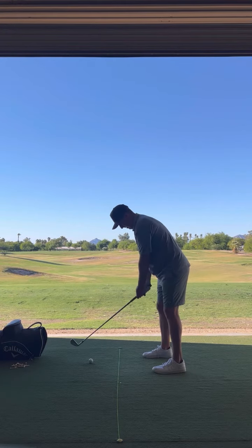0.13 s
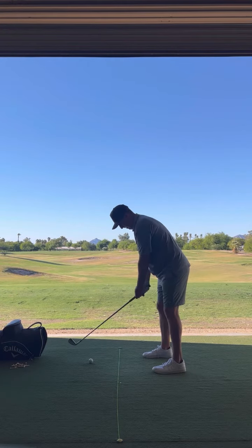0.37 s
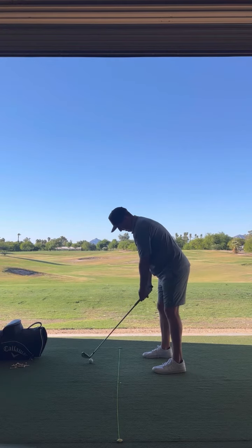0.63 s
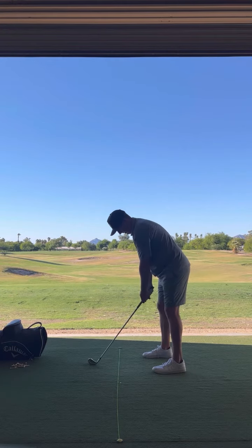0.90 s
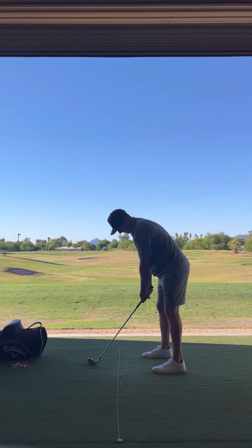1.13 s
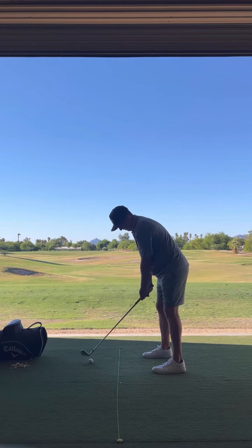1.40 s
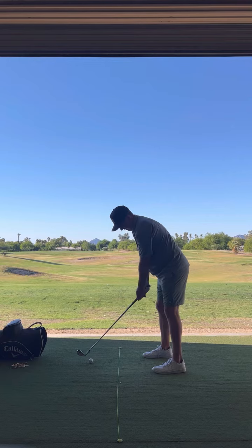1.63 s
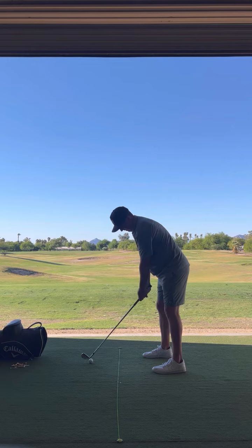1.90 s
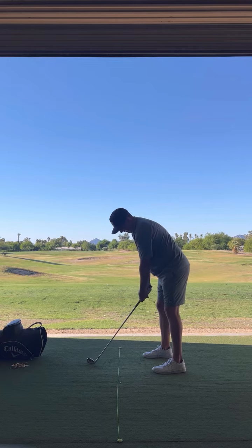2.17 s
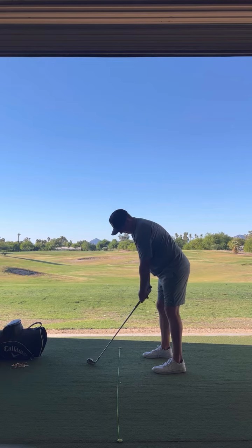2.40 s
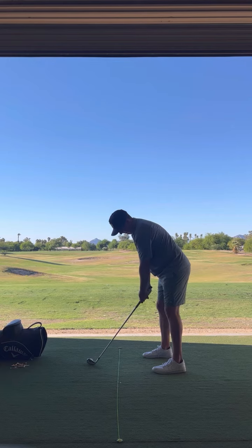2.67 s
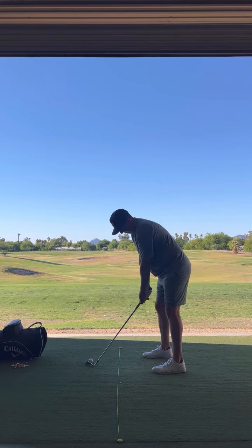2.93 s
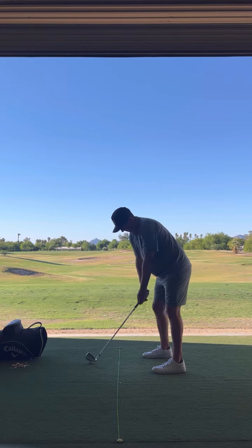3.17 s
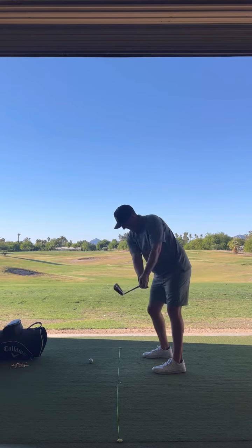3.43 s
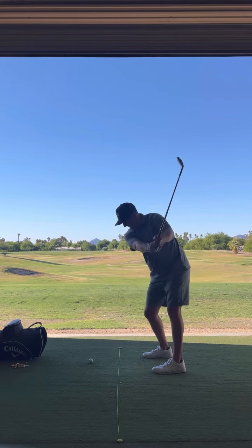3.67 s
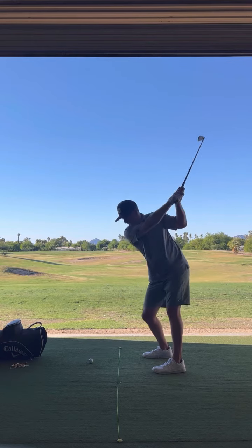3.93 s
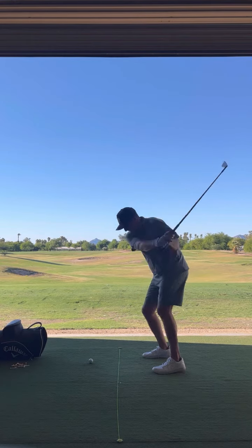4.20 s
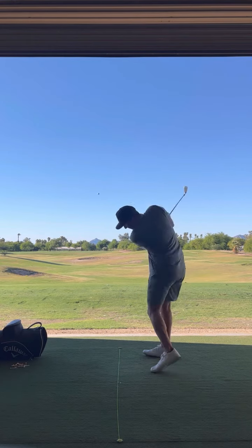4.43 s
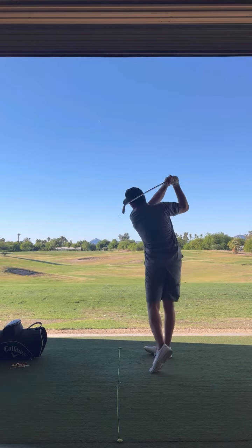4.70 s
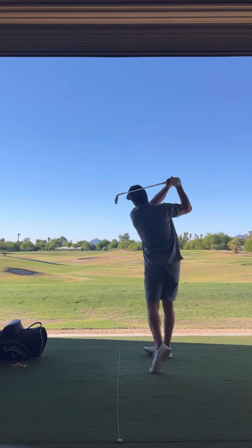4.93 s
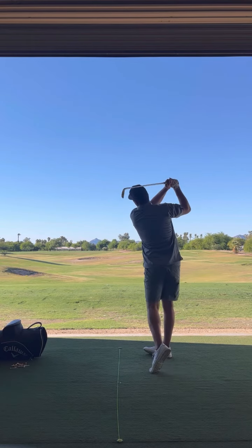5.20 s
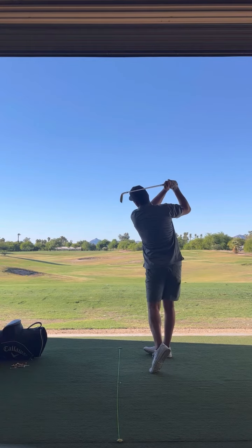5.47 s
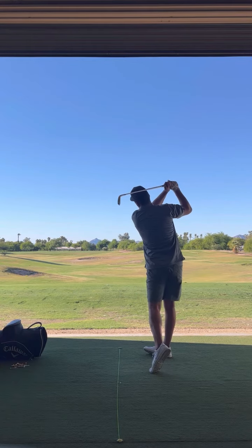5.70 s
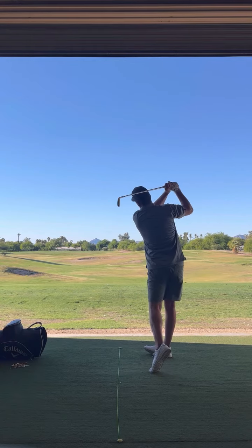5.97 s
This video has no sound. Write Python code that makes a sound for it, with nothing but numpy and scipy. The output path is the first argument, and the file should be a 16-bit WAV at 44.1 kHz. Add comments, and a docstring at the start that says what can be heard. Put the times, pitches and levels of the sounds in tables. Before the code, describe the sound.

A quiet stereo phone pickup under the roof of an open range bay. Throughout, a deep, slightly pulsing machinery and traffic rumble, with a barely audible hum. A faint cloth rustle opens it. From 0.2 to 3.3 s, distant birds give brief calls around 2.3 kHz, some hoarse and falling, some clear and peaked, with soft outdoor echoes. Around 3.7 and 3.9 s a second bird warbles; clothes rustle with the backswing and a tiny high tick sounds at 3.95. At 4.3 s a short swish with a low whistle rises and is cut at 4.32 by one explosive, bright crack of iron on ball, with a mat thud, rapid roof and wall slaps, a thin ringing shaft and a noisy wash fading within a second. Very faint warbles come at 4.8 and 5.1, small ticks at 5.6, 5.86 and 5.94, then rustle as the rumble swells at 6 s.

```python
"""Under the roof of a range bay, machinery and traffic rumble on with two beating low tones and a faint hum.
Clothes rustle from the start and through the swing, while far birds call with gliding tones and echoes.
A second bird warbles and small ticks sound; then an iron swishes down, as rushing noise and a whistle.
It strikes a golf ball off a mat: one crack made of resonances, slaps from roof and walls, a thud,
a ringing shaft and a wash of dying noise. Ticks and rustle follow, and the rumble grows at the end."""
import sys
import numpy as np
from scipy import signal
from scipy.fft import rfft, irfft, next_fast_len
from scipy.io import wavfile
from scipy.ndimage import uniform_filter1d, map_coordinates

SR = 44100
rng = np.random.default_rng(int(sys.argv[2]) if len(sys.argv) > 2 else 0)


def makeup_ratio(level_db):
    """Linear amplitude ratio for a level in decibels (20 dB per factor of ten)."""
    decades = np.asarray(level_db, float) / 20
    return 10 ** decades


def bounce(signal):
    """Save signal as a 16-bit WAV file at the path given by the first command-line argument."""
    frames = np.transpose(np.atleast_2d(signal))
    limited = np.clip(frames, -1, 1)
    pcm = np.round(limited * 32767).astype(np.int16)
    wavfile.write(sys.argv[1], SR, pcm)


N = 268569  # length in samples
T = np.arange(N) / SR
LEFT_RIGHT = np.array([[.5], [-.5]])  # shares a left-minus-right difference between the two sides


def unit(x):
    """Scaled to rms 1."""
    return x / np.sqrt(np.mean(x ** 2) + 1e-20)


def along(points, hz):
    """Reads a curve of (Hz, value) points, straight between them on a log axis."""
    f, v = np.transpose(points)
    return np.interp(np.log(hz + 1), np.log(f + 1), v)


def wobble(rate):
    """A smooth random curve with rate knots a second, 40 at most."""
    knots = rng.standard_normal(int(N * 40 / SR) + 4)
    return map_coordinates(knots, [T * min(rate, 40)])


def filtered(x, response):
    """Passes x through a filter given as a complex response over frequency."""
    m = next_fast_len(x.shape[-1] + 8192)
    return irfft(rfft(x, m) * response(np.fft.rfftfreq(m, 1 / SR)), m)[..., :x.shape[-1]]


def resonance(hz, centre_hz, width_hz):
    """One causal resonance, gain 1 at its centre."""
    return 1j * hz * width_hz / (centre_hz ** 2 - hz ** 2 + 1j * hz * width_hz)


def breathy(count, width_hz):
    """Noise of rms 1, mostly below width_hz: multiplied on a tone it widens the line."""
    return unit(filtered(rng.standard_normal(count), lambda hz: np.exp(-(hz / width_hz) ** 2)))


def swell(peak_s, rise_s, fall_s):
    """A bell-shaped gain with its own width on each side of the peak."""
    return np.exp(-((T - peak_s) / np.where(T < peak_s, rise_s, fall_s)) ** 2)


def tone(hz, db):
    """A sine of given pitch and rms level."""
    return np.sqrt(2) * makeup_ratio(db) * np.sin(2 * np.pi * np.cumsum(hz) / SR)


def add(track, s, sound):
    """Mixes a short sound into the track at s seconds."""
    part = track[..., round(s * SR):][..., :sound.shape[-1]]
    part += sound[..., :part.shape[-1]]


# How alike left and right are in broad noise.
# Each row: pitch in Hz, likeness (1 is the same, 0 unrelated, below 0 opposed; more than 1 counts as 1).
LIKENESS = [(60, 0.95), (150, 1.05), (380, 0.66), (950, 0.41), (2380, 0.32), (5980, -0.17), (15000, 0.25)]


def rush(spectrum, patchy_db):
    """Stereo noise shaped by a spectrum, with patches of random gain; its middle has rms 1."""
    z = signal.stft(rng.standard_normal((2, N)), nperseg=512)[2]
    field = uniform_filter1d(rng.standard_normal(z.shape[1:]), 6, 0)  # smooth over pitch
    field = uniform_filter1d(field, 12, 1)  # smooth over time
    pair = signal.istft(z * makeup_ratio(patchy_db * unit(field)), nperseg=512)[1][:, :N]

    def mid_and_side(hz):
        angle = np.arccos(np.clip(along(LIKENESS, hz), -1, 1)) / 2
        return makeup_ratio(along(spectrum, hz)) * np.array([np.cos(angle), np.sin(angle)])

    mid, side = filtered(pair, mid_and_side)
    return np.array([mid + side, mid - side]) / np.std(mid)


# Unsteady machine tones.
# Each row: pitch in Hz, level in dB before the flutter, pitch wander in Hz, level wander in dB.
MACHINE = [(57.2, -53.5, 2, 0.6), (72.4, -51, .7, 1.2)]


def machine_tones():
    """Two low tones beat together; each wanders and flutters."""
    tones = 0
    for hz, db, wander_hz, wander_db in MACHINE:
        steady = tone(hz + wander_hz * wobble(4.5), db + wander_db * wobble(3.8))
        tones = tones + steady * (1 + .7 * breathy(N, 5.1))
    return tones


def hum():
    """A faint single tone, its pitch and strength unsteady."""
    return tone(362.4 + 1.5 * wobble(8), -65.5) * (.7 + .55 * breathy(N, 12))


# The background grows towards the end.
# One row: loudest at in seconds, swell in seconds, rumble growth in dB, traffic growth in dB.
GROWTH = (6, .5, 2.5, 1.5)
# Spectrum of the rumble. Each row: pitch in Hz, relative level in dB per Hz.
RUMBLE = [(18, -46.5), (30, -17), (44, -3.5), (65, -12), (83, -3.5), (97, -7.5), (119, -9), (146, -10.5),
          (167, -11.5), (210, -12.5), (237, -22.5), (311, -24.5), (330, -17.5), (430, -58), (730, -120)]


def rumble():
    """Deep noise of machinery and traffic, swelling at the end."""
    peak_s, rise_s, growth_db, _ = GROWTH
    level_db = -50 + growth_db * swell(peak_s, rise_s, 1) + .3 * wobble(0.91)
    return makeup_ratio(level_db) * rush(RUMBLE, patchy_db=0.45)


# Spectrum of the far traffic. Each row: pitch in Hz, relative level in dB per Hz.
TRAFFIC = [(200, -38), (260, -10.5), (450, -9.5), (800, -15.5), (1300, -18), (1700, -24.5), (2100, -29.5),
           (2450, -33.5), (2850, -37.5), (3500, -33), (4400, -40.5), (5500, -48), (7400, -56.5),
           (15000, -60)]


def traffic():
    """Higher, softer noise of far traffic, swelling at the end."""
    peak_s, rise_s, _, growth_db = GROWTH
    level_db = -60.5 + growth_db * swell(peak_s, rise_s, 1) + .4 * wobble(1.2)
    return makeup_ratio(level_db) * rush(TRAFFIC, patchy_db=1.26)


# Spectrum of rubbing cloth. Each row: pitch in Hz, relative level in dB per Hz.
CLOTH = [(900, -39.5), (1500, -15), (3000, -10.5), (4500, -11), (7200, -18.5), (8200, -43), (9400, -25),
         (12000, -16), (14500, -26.5), (16000, -52.5)]
# Moves of the clothes. Each row: loudest at in seconds, swell in seconds, fade in seconds,
# rustle level in dB, level of the high sheen in dB over the rustle.
MOVES = [(.07, 0.074, 0.061, -80.5, -25), (3.76, 0.19, 0.38, -75, -8), (3.97, 0.038, 0.044, -93, -9),
         (4.3, 0.083, 0.19, -71, -1), (4.6, .15, .1, -74, -4.5), (4.88, .04, .04, -81, -9),
         (6.12, 0.29, .3, -67.5, -24)]


def clothes():
    """Flickering noise in two bands, rustle and sheen, swells with each move."""
    cloth = makeup_ratio(1.1 * wobble(22)) * rush(CLOTH, patchy_db=2.4)
    body = filtered(cloth, lambda hz: hz < 8500)
    rustle = sum(makeup_ratio(db) * swell(s, rise, fall) for s, rise, fall, db, _ in MOVES)
    sheen = sum(makeup_ratio(db + over_db) * swell(s, rise, fall) for s, rise, fall, db, over_db in MOVES)
    return rustle * unit(body) + sheen * unit(cloth - body)


def outdoors(dry, echo_db, t60):
    """Trees and buildings return a far call smeared."""
    t = np.arange(SR // 4) / SR
    trees = rng.standard_normal((2, len(t))) * makeup_ratio(-60 * t / t60) * (t > .012)
    trees = trees + 0.32 * trees[::-1]  # each side hears some of the other
    trees[:, round(.062 * SR)] = 11  # one wall answers more clearly
    echo = signal.fftconvolve(dry[None], trees / np.linalg.norm(trees[0]), axes=1)[:, :N]
    return dry + makeup_ratio(echo_db) * echo


# Hoarse falling calls. Each row: start in seconds, length in seconds, top pitch in Hz, level in dB.
FALLING = [(.17, .08, 2260, -70.5), (.59, .1, 2330, -67.5), (1.905, .09, 2250, -69.5),
           (2.59, .08, 2320, -73.5)]
# Clear calls, up then sharply down. Each row: start in seconds, length in seconds, top pitch in Hz, level in dB.
PEAKED = [(.865, 0.094, 2404, -66), (1.21, 0.12, 2350, -78), (1.535, .085, 2390, -67.5),
          (2.935, 0.07, 2400, -70), (3.232, 0.081, 2480, -69.5)]
# Shape of each kind of call. One row: starting pitch as a share of the top, moment of the top as a share
# of the length, final pitch as a share of the top, roughness as a share of the power.
FALLING_SHAPE = (.97, .15, .89, .4)
PEAKED_SHAPE = (.89, 0.49, .79, .03)


def bird():
    """Each call glides to its top pitch and drops; noise on the tone makes it hoarse."""
    dry = np.zeros(N)
    for calls, (start, turn, end, rough) in ((FALLING, FALLING_SHAPE), (PEAKED, PEAKED_SHAPE)):
        for s, length, top_hz, db in calls:
            u = np.linspace(0, 1, round(length * SR))  # progress through the call
            glide = np.interp(u, [0, turn, 1], [start, 1, end])
            hz = top_hz * uniform_filter1d(glide, size=250, mode="nearest")
            voice = np.sqrt(1 - rough) + np.sqrt(rough) * breathy(len(u), 170)
            fade = np.clip(np.minimum(u / 0.19, (1 - u) / 0.094), 0, 1)
            add(dry, s, tone(hz, db) * voice * fade)
    return outdoors(dry, echo_db=-4, t60=.33)


# Warbling chirps of a second bird. Each row: start in seconds, length in seconds, middle pitch in Hz,
# warble depth at the start in Hz, level in dB before shaping.
WARBLES = [(3.733, .045, 2800, 430, -68), (3.901, .05, 2900, 400, -68), (4.84, .05, 2900, 300, -83),
           (5.14, .04, 3000, 300, -82)]


def warbler():
    """The pitch swings up and down a few times in each fading chirp."""
    out = np.zeros(N)
    for s, length, hz, depth_hz, db in WARBLES:
        t = np.arange(round(length * SR)) / SR
        turn = 2 * np.pi * 57 * t  # 57 swings a second
        shape = np.sin(np.pi * np.sqrt(t / length)) * (1 + 0.25 * breathy(SR // 4, 120)[:len(t)])
        shape = shape * (1 - .7 * np.sin(turn))  # upward strokes are the loud ones
        add(out, s, shape * tone(hz + depth_hz * np.cos(turn) * np.exp(-t / 0.058), db))
    return outdoors(out, echo_db=-8, t60=.25)


# Small ticks. Each row: start in seconds, pitch in Hz, level in dB, first overtone in dB over it.
TICKS = [(3.948, 6164, -65, -25), (5.635, 1350, -53, -25), (5.862, 1520, -50, -4), (5.94, 5800, -66, -25)]


def ticks():
    """Each tick is a short grainy resonance with two dying overtones."""
    out = np.zeros(N)
    t = np.arange(SR // 10) / SR
    for s, hz, db, snap_db in TICKS:
        click = np.sin(2 * np.pi * hz * t) * makeup_ratio(-60 * t / 0.015) * (1 + 0.18 * rng.standard_normal(len(t)))
        click = filtered(click, lambda f: resonance(f, hz, 0.2 * hz) ** 2)
        snap = 0
        for k in (2.3, 3.05):  # overtones as multiples of the pitch
            snap = snap + np.sin(2 * np.pi * k * hz * t) * makeup_ratio(snap_db - 7 * (k - 2.3) - 60 * t / .012)
        snap = snap * (1 - np.exp(-t / .0006))  # soft start
        add(out, s, makeup_ratio(db) * (click + snap))
    return out


# Spectrum of air rushing past the club. Each row: pitch in Hz, relative level in dB per Hz.
SWISH = [(120, -41), (200, -3), (564, -15.5), (957, -15.5), (1400, -9), (6350, -27.5), (7760, -34.5),
         (8350, -96), (8820, -42.5), (10000, -31.5), (15500, -46.5)]


def swish():
    """Club head through the air: rush and whistle swell to a peak and stop at the ball."""
    stop = np.exp(-np.clip(T - ARRIVALS[0][0], 0, None) / .008)  # dies within ms of the blow
    air = swell(4.305, .042, .2) * makeup_ratio(-43) * rush(SWISH, patchy_db=0.8)
    peak_s, peak_hz, sag_hz_per_s = 4.295, 545, 800
    pitch_hz = np.clip(peak_hz - sag_hz_per_s * (T - peak_s), 0, None)
    whistle = tone(pitch_hz, -40) * breathy(N, 120)  # vortices shed unevenly by the shaft
    return stop * (air + swell(peak_s, .022, 0.045) * whistle)


# Resonances of face and ball. Each row: pitch in Hz, width in Hz, left level in dB, right level in dB.
FACE = [(443, 690, -7.5, -1), (1000, 170, -1, 4), (1480, 250, 1.5, 2.5), (2730, 1000, 1.5, -7),
        (3700, 1100, 1.5, -11), (7100, 650, -7.5, -13), (10200, 1400, -16.5, -15.5),
        (13800, 1600, -21, -25)]


def face(hz, sided):
    """Resonances of the blow; sided 0-1 sets how differently the two sides hear them."""
    modes = 0
    for k, (centre_hz, width_hz, left, right) in enumerate(FACE):
        level_db = (left + right) / 2 + sided * (left - right) * LEFT_RIGHT
        modes = modes + (-1) ** k * makeup_ratio(level_db) * resonance(hz, centre_hz, width_hz)
    lag_s = 7e-5 * np.array([[1], [0]])  # the left side hears it later
    return modes * np.exp(-2j * np.pi * hz * lag_s)


# The blow, then its slaps from mat, roof and walls.
# Each row: start in seconds, relative level in dB, left minus right in dB.
ARRIVALS = [(4.3234, 0.5, 1), (4.3259, -8, -1.5), (4.3271, -12.5, -1.5), (4.3318, -10.5, 0.5),
            (4.3355, -9.5, -5), (4.3381, -2, 4), (4.339, -9.5, -6), (4.3424, -10.5, 0.5), (4.3441, -8.5, 0),
            (4.3488, -11, 0.5), (4.353, -13, 2.5), (4.3583, -14, 0.5)]


def crack_and_slaps():
    """One impulse and its scattered echoes excite the resonances of the face."""
    t = np.arange(SR) / SR
    start = ARRIVALS[0][0]
    path = np.zeros((2, SR))
    for s, db, pan_db in ARRIVALS:
        # tilt: treble rise per octave above about 2 kHz
        smear_ms, tilt_db = (1.3, 1.74) if s > start else (0.33, 0)
        grit = rng.standard_normal((3, 400))
        scatter = .8 * grit[0] + 0.83 * grit[1:]  # part shared, part each side's own
        burst = scatter * np.exp(-t[:400] * 1000 / smear_ms) * .17  # rough surfaces scatter
        burst[:, 0] = 1
        burst = filtered(burst / np.linalg.norm(burst[0]), lambda hz: (1 + 1j * hz / 2000) ** (tilt_db / 6))
        add(path, s - start, makeup_ratio(db + pan_db * LEFT_RIGHT) * burst)
    near = t < .012
    first = filtered(path * near, lambda hz: face(hz, 0.98))
    # later slaps come from all around, thinner and more alike on both sides
    later = filtered(path * ~near, lambda hz: face(hz, 0.41) * (0.51 + .9 * resonance(hz, 3300, 3000)))
    return first + makeup_ratio(-2.5) * later


# Resonances of the mat. Each row: pitch in Hz, width in Hz, level in dB.
MAT = [(67.6, 32, -1.5), (168, 42, 8.5), (241, 100, 2), (335, 120, 10)]


def mat_thud():
    """A push of a few ms, as the sole digs in, sets off the mat's low resonances."""
    t = np.arange(SR) / SR
    push = makeup_ratio(-8) * (t / .003) ** 2 * np.exp(-t / 0.0019)
    return filtered(push, lambda hz: sum((-1) ** k * makeup_ratio(db) * resonance(hz, c, w)
                                         for k, (c, w, db) in enumerate(MAT)))


# Tones of the shaft. Each row: pitch in Hz, peak level in dB, time to fall 60 dB in seconds.
SHAFT = [(1035, -50.5, 0.58), (1318, -46, .9), (1376, -47, 0.49), (1514, -48, 0.97)]


def shaft_ring():
    """The shaft rings on in dying, slightly uneven tones."""
    t = np.arange(SR) / SR
    return sum(makeup_ratio(db - 60 * t / t60) * np.sin(2 * np.pi * hz * t) * (1 + 0.31 * breathy(SR, 30))
               for hz, db, t60 in SHAFT)


# How long the bay rings. Each row: pitch in Hz, time to fall 60 dB in seconds.
BAY = [(100, 2), (400, 0.39), (1200, 0.8646), (3000, 0.7869), (6000, 0.47), (8000, 0.36), (12000, 0.34)]
# Colour of the bay's ringing. Each row: pitch in Hz, relative level in dB.
BAY_COLOUR = [(60, -27.5), (150, -13.5), (300, -2.5), (500, 0.5), (800, -5.5), (1300, -3), (2000, -7.5),
              (3500, -3), (5500, -5.5), (7000, -10.5), (8200, -25.5), (10500, -16), (14000, -19.5),
              (16500, -42)]


def bay_wash():
    """The bay's wash, slightly streaky: noise that dies at its own speed for each pitch."""
    t = np.arange(SR) / SR
    hz, frames, z = signal.stft(rng.standard_normal((2, SR)), SR, nperseg=256)
    dying = makeup_ratio(along(BAY_COLOUR, hz)[:, None] - 60 * frames / along(BAY, hz)[:, None])
    # short random streaks, a little louder or softer at each pitch
    streaks = makeup_ratio(2 * unit(uniform_filter1d(rng.standard_normal(dying.shape), 12, 1)))
    wash = signal.istft(z * streaks * dying, SR, nperseg=256)[1][:, :SR]
    filling = np.clip(t / .024, 0, 1) ** 2  # the bay fills once the first slaps have met
    early = 1 + 2.7 * makeup_ratio(-60 * t / 0.24)  # open sides drain the first sound fast
    wash = (wash + 0.1 * wash[::-1]) * filling * early
    return makeup_ratio(-18.5) * wash * makeup_ratio(1.2 * LEFT_RIGHT)


def strike():
    """The iron meets ball and mat: crack, thud, ring and wash start together."""
    out = np.zeros((2, N))
    add(out, ARRIVALS[0][0], makeup_ratio(20.5) * crack_and_slaps() + mat_thud() + shaft_ring() + bay_wash())
    return out


# Uneven pair of microphone ports. Each row: pitch in Hz, left minus right in dB.
PORTS = [(60, -1.5), (110, -1.5), (200, -2), (380, -1.0), (700, -3), (1290, -1.0), (2380, 0.5), (4400, 4),
         (8120, 0), (15000, -1)]


def scene():
    """All but the strike passes the uneven pair of microphone ports."""
    background = machine_tones() + hum() + rumble() + traffic()
    around = background + clothes() + bird() + warbler() + ticks() + swish()
    return filtered(around, lambda hz: makeup_ratio(along(PORTS, hz) * LEFT_RIGHT)) + strike()


def band_limit(x):
    """A steep low-pass at the top of the band."""
    return signal.sosfilt(signal.butter(12, 16670, fs=SR, output="sos"), x)


def record(dry):
    """The phone cuts the deepest bass and the top treble, and rounds off the highest peaks."""
    low_cut_hz, treble_hz, ceiling = 35, 14960, .95
    cut = filtered(dry, lambda hz: 1 / (1 + (low_cut_hz / (hz + 1)) ** 6) / (1 + (hz / treble_hz) ** 12))
    soft = cut / (1 + np.abs(cut / ceiling) ** 4) ** (1 / 4)
    return band_limit(soft)


dry = scene()
out = record(dry)
bounce(out)
```